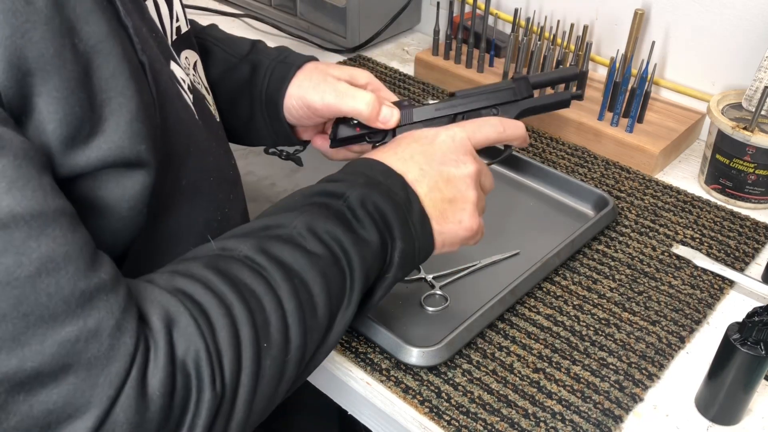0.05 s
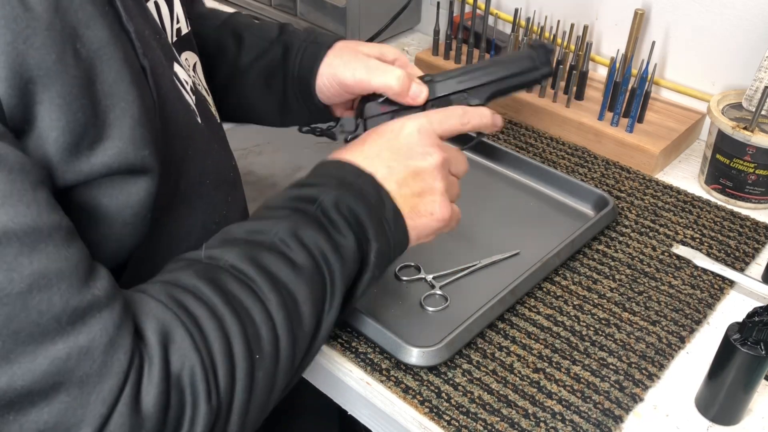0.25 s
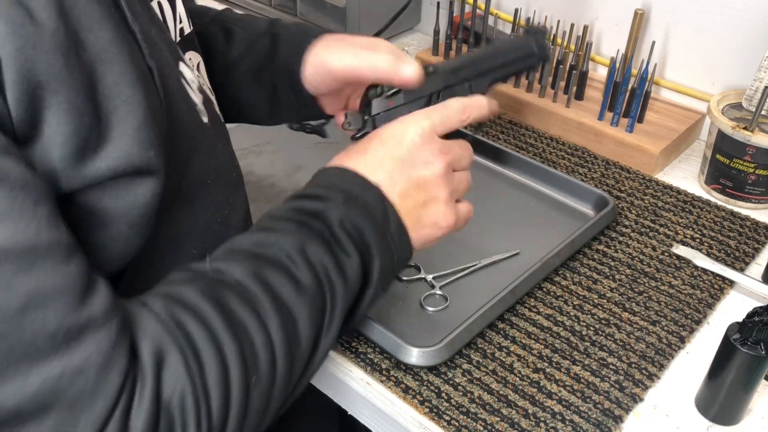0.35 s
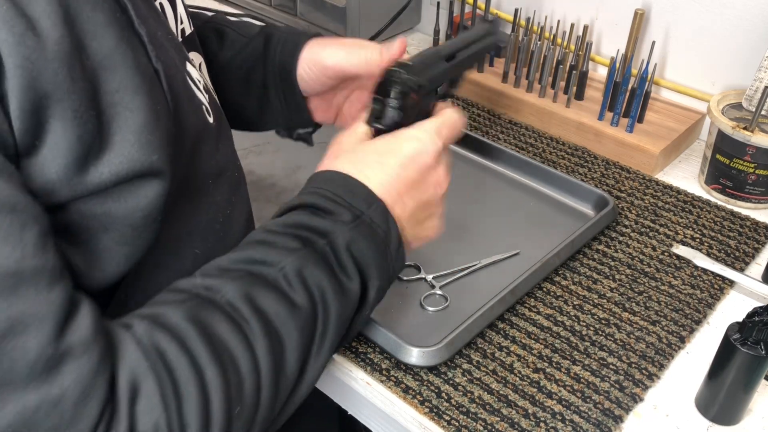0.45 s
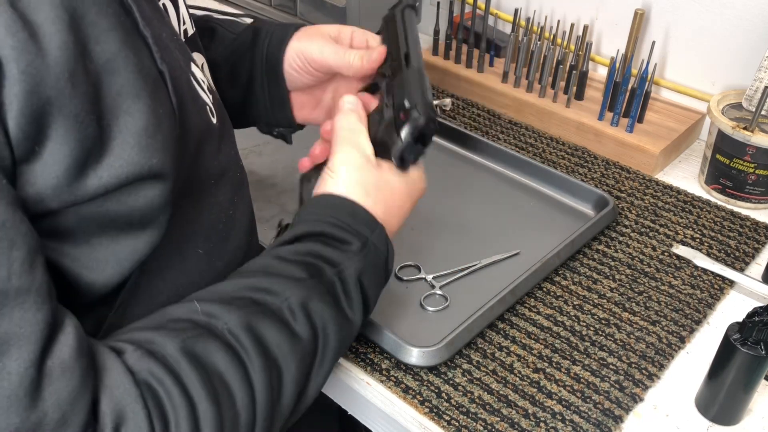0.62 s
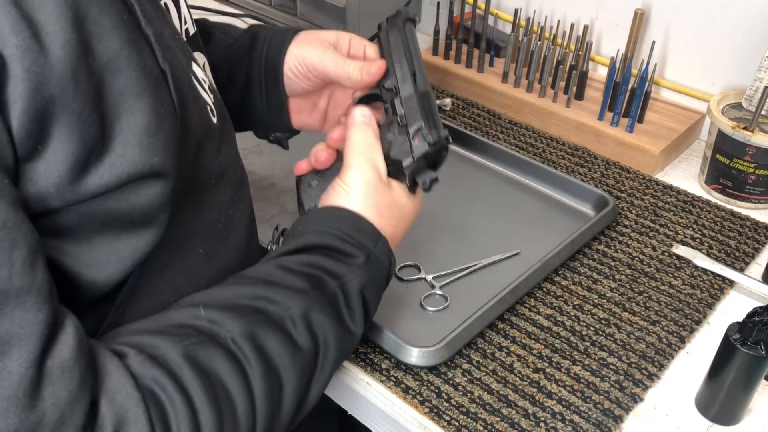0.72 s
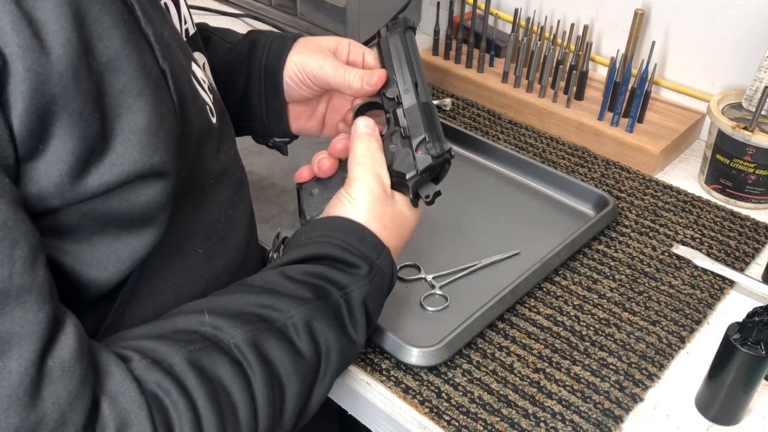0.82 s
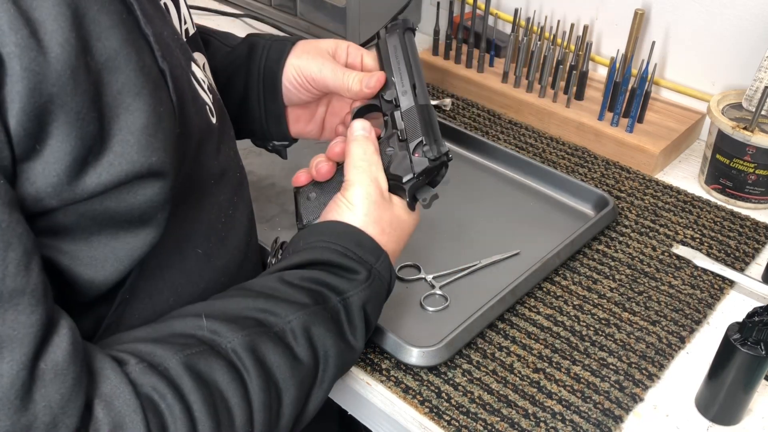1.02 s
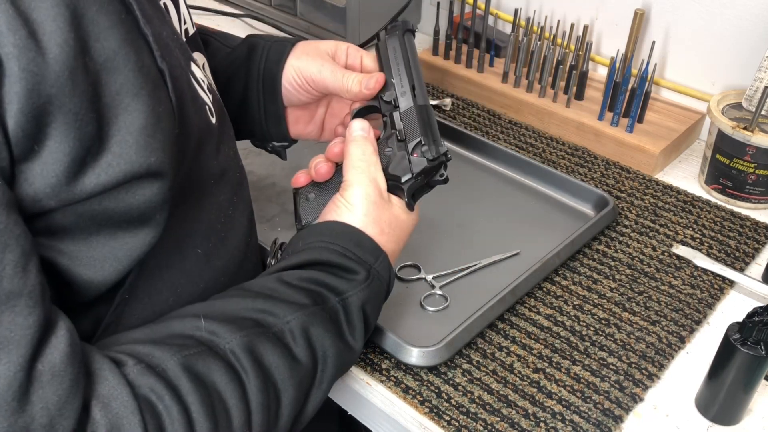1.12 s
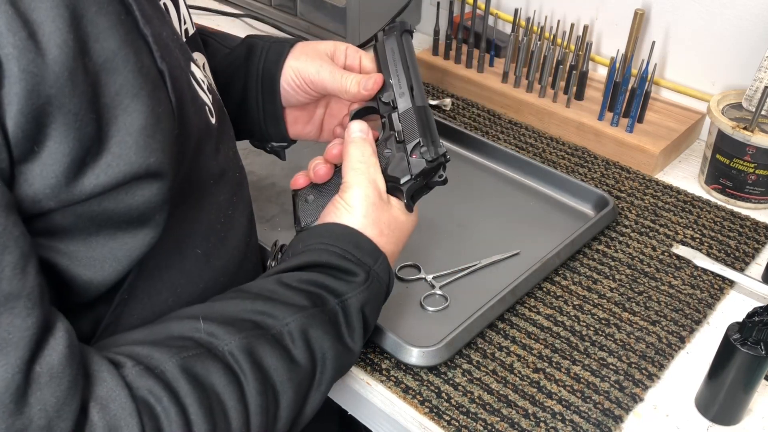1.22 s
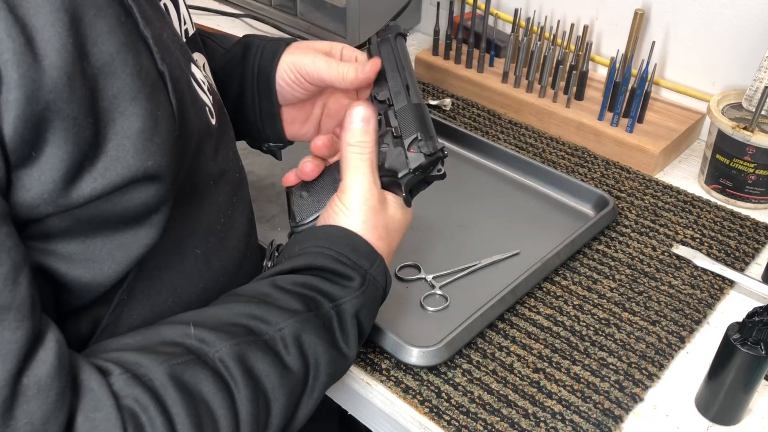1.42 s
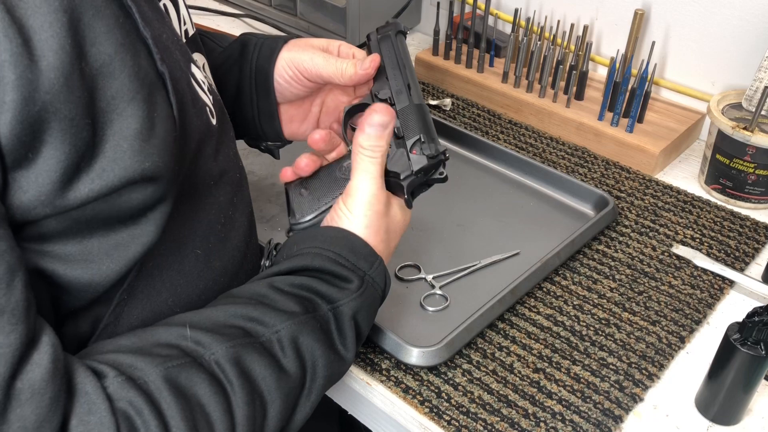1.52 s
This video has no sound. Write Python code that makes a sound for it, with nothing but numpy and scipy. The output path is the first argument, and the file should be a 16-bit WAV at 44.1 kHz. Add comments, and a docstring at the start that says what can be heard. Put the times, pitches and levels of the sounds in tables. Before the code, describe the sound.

A pistol slide is worked by hand in a hard-walled workshop. The tail of an earlier blow fades at the start; at 0.2 s a short scrape leads into a loud, tight cluster of steel clacks with a dull thud and bright reverberation. Barely audible ticks follow around 0.7-0.85 s. At 1.02 s a catch snaps crisply; at 1.34-1.39 s come faint ticks and a softer click, over low rumble, slight rustle and faint hum.

```python
"""A pistol slide is worked by hand over a workbench: steel scrapes, slams home and a catch snaps over.
Each contact is a short pulse and a scattered crack over ringing steel modes; dull thuds lie under the blows.
The hard-walled workshop answers with one wall echo and a long bright tail of noise decaying by bands.
Behind it lie room noise, low rumble, a rustle of sleeve and hand, and a faint wavering electrical hum."""
import sys
import numpy as np
from scipy import signal
from scipy.fft import rfft, irfft
from scipy.io import wavfile

SR = 44100
rng = np.random.default_rng(int(sys.argv[2]) if len(sys.argv) > 2 else 0)


def wav_out(sig):
    """Save sig, one row per channel (or a flat mono array), as 16-bit PCM at SR to the path in sys.argv[1]."""
    wavfile.write(sys.argv[1], SR, np.round(np.clip(np.atleast_2d(sig).T, -1, 1) * 32767).astype(np.int16))


def volts_from_decibels(level):
    """Turn decibel levels (scalar or array-like) into linear amplitude factors."""
    exponent = np.asarray(level, float) / 20
    return 10 ** exponent


N = 68355
LEAD = SR // 4  # samples kept ahead of time zero, for blows whose tails are already sounding

# The slide slams home. Each row: start in seconds, nominal level in dB, centre of the blow's colour in Hz,
# its width in octaves, crack T60 in seconds, ringing in dB.
SLIDE_SLAMS = [(-0.06, -12, 3180, 0.77, .03, -20.5), (-0.05, -25.5, 2570, 2.13, .03, -22.5),
               (0.1997, -8, 4500, 1.25, .025, -4), (0.2028, -8.5, 3500, 1.41, .025, -9.5),
               (0.2094, -2, 2750, 0.49, .006, -14)]
# The catch snaps over. Each row: the same columns as the slams.
CATCH_SNAPS = [(1.0221, -6.5, 5660, 1.106, 0.017, -6), (1.0236, -18.5, 1940, 0.92, 0.0087, -15),
               (1.0275, -18.5, 7950, 0.92, 0.022, -1.5), (1.392, -28.5, 4000, 1.5, .018, -24),
               (1.3926, -22, 4960, 0.3, 0.018, -40)]
# Modes of slide and frame. Each row: frequency in Hz, level in dB when the slide strikes,
# level in dB when the catch strikes, T60 in seconds.
STEEL_MODES = [(563, -13.5, -9.5, 0.01), (1200, -7, -43, 0.056), (1600, -20.5, -5, 0.035),
               (2142, 0, -5, 0.036), (2341, -4.5, -5, 0.02), (2537, -4, -3, 0.032),
               (2654, -4.5, -31, 0.033), (2911, -12.5, -15, .04), (3500, -8, -21, 0.017),
               (4370, -2.5, -6.5, 0.1), (4506, -2.5, 1.5, 0.028), (5094, -7.5, -21.5, 0.047),
               (5260, -9.5, -6.5, .03), (5914, -2, 0.5, .03), (6450, -6, -8, 0.027),
               (7285, -19, -10.5, 0.038), (8790, -5, -9, .03), (8960, -11.5, -5.5, .03),
               (9720, -12.5, -16.5, 0.021), (10640, -21, -9, 0.027), (11700, -13.5, -28, 0.051),
               (12860, -19, -13, .02), (14600, -22, -24.5, .03)]
# Dull knocks of the frame in the hand. Each row: start in seconds, dry peak in dB, lower edge in Hz,
# upper edge in Hz, T60 in seconds.
FRAME_THUDS = [(-0.06, -32, 287, 1050, 0.046), (0.187, -44, 302, 1200, 0.024),
               (0.2089, -24.5, 215.6, 1099, .03), (1.0227, -24.5, 403, 1587, 0.014),
               (1.3921, -37, 470, 2340, .025)]
# Small ticks of loose parts. Each row: start in seconds, nominal level in dB, colour in Hz.
LOOSE_TICKS = [(0.1978, -67, 4040), (0.72, -64, 4413), (0.755, -63, 4850), (0.85, -63.5, 4500),
               (0.966, -71, 5070), (1.0175, -29, 5080), (1.0181, -30.5, 5500), (1.3372, -43.5, 8760),
               (1.338, -46.5, 4440), (1.3565, -55, 4800), (1.3602, -52.5, 4500), (1.3642, -48.5, 3000)]
# Slide scraping on its rails. Each row: start in seconds, length in seconds (clicks stop by 0.136 s),
# rms level in dB over that length, colour in Hz.
RAIL_SCRAPES = [(0.176, .024, -43.5, 2400), (1.016, .006, -33, 3835), (1.33, 0.17, -66.5, 3500)]
# Decay of the room tail. Each row: frequency in Hz, T60 in seconds.
ROOM_DECAY = [(250, .5), (600, 0.69), (1200, 0.6081), (2400, 0.59), (5000, 0.51), (9000, 0.4937),
              (15000, 0.07)]
# Colour of the room tail. Each row: frequency in Hz, relative level in dB.
ROOM_COLOUR = [(250, -11), (600, -3.5), (1200, 1), (2400, -0.8), (5000, -3.6), (9000, -2.56), (15000, 5)]
# Colour of the room noise. Each row: frequency in Hz, relative level in dB per Hz.
NOISE_COLOUR = [(70, -18), (120, -10.5), (250, -18), (500, -14.5), (1000, -20.5), (2500, -22.5),
                (5000, -28), (9000, -35), (16000, -48.5)]
# Course of the low rumble. Each row: time in seconds, rms level in dB.
RUMBLE_LEVEL = [(0.0, -63.5), (0.2, -59), (0.6, -57.5), (0.9, -58), (1.15, -62), (1.33, -47), (1.45, -55.5),
                (1.55, -54.5)]
# Colour of the rumble. Each row: frequency in Hz, relative level in dB per Hz.
RUMBLE_COLOUR = [(8, -20.5), (13, 3), (29, -3), (45, -19), (60, -12.5), (85, -26.5), (120, -29),
                 (200, -47.5), (500, -120)]
# Course of the rustle of sleeve and hand. Each row: time in seconds, rms level in dB.
RUSTLE_LEVEL = [(0.0, -100), (0.098, -84), (0.194, -63), (0.43, -83.5), (1.294, -72.5), (1.334, -65.5),
                (1.55, -68.5)]
# Electrical hum. Each row: frequency in Hz, nominal level in dB, onset in seconds.
HUM_LINES = [(360, -84, 0.0), (481, -78, .76), (1123, -81, 0.0)]

SKIRT_DB = -25.5  # weakest excitation, far from a blow's colour
PULSE_DB, MODE_SPREAD_DB = -1, 1.5  # peak of first contact; random spread of each mode
SCATTER_GAIN = 0.75  # feedback of the all-pass loops
SMALL_T60_S, SMALL_RING_DB = 0.006, -2  # crack decay and ringing of ticks and scrapes
TICK_OCTAVES, SCRAPE_OCTAVES = 0.35, 1
CLICKS_PER_S, CLICK_DIP_DB = 4000, 1.5  # scrape density; average drop below the strongest click
ECHO_S, ECHO_DB = 0.0088, -7  # nearest wall: about three metres of extra path
ROOM_DB, ROOM_ONSET_S = -6.5, 0.015  # tail energy against the direct sound; fade-in
EARLY_DB, EARLY_T60_S = -0.5, 0.15  # extra early tail
NOISE_DB = -70
RUSTLE_LOW_HZ, RUSTLE_HIGH_HZ = 88, 190
HUM_WIDTH_HZ = 5.5  # pole frequency of the wavering
PEAK_CEILING = 1.1  # height towards which peaks are rounded
CUTOFF_HZ = 17000  # edge of the stop band, 60 dB down


def in_log_hz(points, hz):
    """Read a table of frequency and value on a log frequency axis."""
    table_hz, value = np.transpose(points)
    return np.interp(np.log(np.maximum(hz, 1)), np.log(table_hz), value)


def dying(t60, size):
    """Exponential decay, falling 60 dB in t60 seconds."""
    return volts_from_decibels(-60 * np.arange(size) / (t60 * SR))


def band(x, low_hz, high_hz):
    """Band-pass between two edges, held within 20 Hz and 19 kHz."""
    edges = np.clip([low_hz, high_hz], 20, 19000)
    return signal.sosfilt(signal.butter(2, edges, "band", fs=SR, output="sos"), x)


def add(out, sound, s):
    """Mix a sound in at a time in seconds."""
    i = int(round(s * SR)) + LEAD
    out[i:i + len(sound)] += sound[:len(out) - i]


def colour(hz, centre_hz, octaves):
    """Bell-shaped weight in log frequency over a low skirt."""
    distance = np.log2(np.maximum(hz, 1) / centre_hz) / octaves
    return np.exp(-0.5 * distance ** 2) + volts_from_decibels(SKIRT_DB)


def scatter(t60, size):
    """A click scattered through a chain of short all-pass loops: a dying crackle with an even spectrum."""
    x = (np.arange(size) == 0) * np.sqrt(np.sum(dying(t60, size) ** 2))
    for share in rng.uniform(0.3, 1, 7) * np.geomspace(0.06, 0.008, 7):
        loop = np.zeros(int(share * t60 * SR) + 3)
        loop[0], loop[-1] = 1, -SCATTER_GAIN
        x = signal.lfilter(loop[::-1], loop, x + 1e-18)
    return x


def steel_ring(centre_hz, octaves, place, size):
    """Decaying sine modes of the steel, weighted by the blow's colour and by the place struck."""
    t = np.arange(size) / SR
    ring = np.zeros(size)
    for k, (hz, *place_db, t60) in enumerate(STEEL_MODES):
        level = volts_from_decibels(place_db[place] + MODE_SPREAD_DB * rng.standard_normal())
        level = level * colour(hz, centre_hz, octaves) * (-1) ** k  # neighbours in opposite sign
        ring += level * np.sin(2 * np.pi * hz * t) * dying(t60, size)
    return ring


def blow(centre_hz, octaves, crack_t60, ring_db, place=0, size=8192):
    """One contact: a pulse and a scattered crack over the ringing modes (place 0 slide, 1 catch)."""
    low, high = centre_hz * 2 ** -octaves, centre_hz * 2 ** octaves
    ring = volts_from_decibels(ring_db) * steel_ring(centre_hz, octaves, place, size)
    white = scatter(crack_t60, size)
    crack = band(white, low, high) + volts_from_decibels(SKIRT_DB) * white
    pulse = band((np.arange(size) == 0).astype(float), low, high)
    return ring + crack - volts_from_decibels(PULSE_DB) * pulse / np.max(np.abs(pulse))


def small_contact(hz, octaves):
    """A light contact of steel parts: a blow whose ringing is damped."""
    return blow(hz, octaves, SMALL_T60_S, SMALL_RING_DB) * dying(3 * SMALL_T60_S, 8192)


def thud(low_hz, high_hz, t60, size=4096):
    """A dull scattered knock that dies quickly, peak 1."""
    knock = band(scatter(t60, size), low_hz, high_hz)
    return knock / np.max(np.abs(knock))


def grit(length, size=6000):
    """Dense uneven clicks for the length of a stroke, within size samples."""
    when, big, sign = rng.random((3, size))
    clicks = (when < CLICKS_PER_S / SR) * np.sign(sign - 0.5)
    clicks = clicks * volts_from_decibels(CLICK_DIP_DB * np.log(big + 1e-3))
    return clicks * (np.arange(size) < length * SR)


def scrape(length, hz):
    """Steel rubbing on steel: grit in which every click sets off a small contact, scaled to rms 1."""
    rub = signal.fftconvolve(grit(length), small_contact(hz, SCRAPE_OCTAVES))
    return rub / np.std(rub[:int(length * SR)])


def pistol():
    """Blows, thuds, ticks and scrapes on one steel body, dry."""
    out = np.zeros(N + LEAD)
    for place, table in enumerate((SLIDE_SLAMS, CATCH_SNAPS)):
        for s, db, *kind in table:
            add(out, volts_from_decibels(db) * blow(*kind, place=place), s)
    for s, db, *kind in FRAME_THUDS:
        add(out, volts_from_decibels(db) * thud(*kind), s)
    for s, db, hz in LOOSE_TICKS:
        add(out, volts_from_decibels(db) * small_contact(hz, TICK_OCTAVES), s)
    for s, length, db, hz in RAIL_SCRAPES:
        add(out, volts_from_decibels(db) * scrape(length, hz), s)
    return out


def room_tail():
    """Diffuse noise that dies band by band, stronger early on, with unit energy."""
    size = SR * 3 // 2
    edges = 120 * 2 ** np.arange(0, 7.3, 0.5)  # half octaves
    white = rng.standard_normal((2, size))
    tail = np.zeros(size)
    for k, (low, high) in enumerate(zip(edges, edges[1:])):
        hz = np.sqrt(low * high)
        level = volts_from_decibels(in_log_hz(ROOM_COLOUR, hz))
        # neighbouring bands take different noise
        tail += level * band(white[k % 2], low, high) * dying(in_log_hz(ROOM_DECAY, hz), size)
    tail = tail * (1 + volts_from_decibels(EARLY_DB) * dying(EARLY_T60_S, size))
    tail = tail * np.clip(np.arange(size) / SR / ROOM_ONSET_S, 0, 1) ** 2
    return tail / np.sqrt(np.sum(tail ** 2))


def workshop(x):
    """Direct sound, one wall echo and the diffuse tail, by convolution."""
    answer = volts_from_decibels(ROOM_DB) * room_tail()
    answer[0] += 1
    answer[int(ECHO_S * SR)] += volts_from_decibels(ECHO_DB)
    return signal.fftconvolve(x, answer)[LEAD:LEAD + N]


def rms_one(x):
    """Scale to rms 1."""
    return x / np.sqrt(np.mean(x ** 2) + 1e-20)


def coloured(points, size):
    """Noise with a given spectrum, empty up to its first frequency, rms 1."""
    hz = np.arange(size // 2 + 1) * SR / size
    shape = volts_from_decibels(in_log_hz(points, hz)) * (hz > points[0][0])
    return rms_one(irfft(rfft(rng.standard_normal(size)) * shape, size))


def course(points):
    """Gain over time from a table of seconds and dB."""
    return volts_from_decibels(np.interp(np.arange(N) / SR, *np.transpose(points)))


def room_noise():
    """Steady coloured noise of the room."""
    return volts_from_decibels(NOISE_DB) * coloured(NOISE_COLOUR, N)


def rumble():
    """Low coloured noise that swells and sinks."""
    return course(RUMBLE_LEVEL) * coloured(RUMBLE_COLOUR, N)


def rustle():
    """Soft low rustle of sleeve and hand: band-passed noise under a level curve."""
    return course(RUSTLE_LEVEL) * rms_one(band(rng.standard_normal(N), RUSTLE_LOW_HZ, RUSTLE_HIGH_HZ))


def hum():
    """Sine lines whose levels waver with slow smoothed noise."""
    t = np.arange(N) / SR
    out = np.zeros(N)
    r = np.exp(-2 * np.pi * HUM_WIDTH_HZ / SR)
    for hz, db, start in HUM_LINES:
        waver = rms_one(signal.lfilter([1], [1, -2 * r, r * r], rng.standard_normal(N)))
        level = volts_from_decibels(db + 1.5 + 2.5 * waver)  # amplitude in dB, wavering by 2.5 dB rms
        out += level * np.sin(2 * np.pi * hz * t) * np.clip((t - start) / 0.01, 0, 1)
    return out


def background():
    """Sum of the quiet layers behind the pistol."""
    return room_noise() + rumble() + rustle() + hum()


def scene():
    """Pistol in its workshop over the background, one channel."""
    return (workshop(pistol()) + background())[None]


def roll_off(x):
    """The treble ends steeply here."""
    return signal.sosfilt(signal.butter(12, 16810, fs=SR, output="sos"), x)


def record(dry):
    """The microphone signal has its peaks softly rounded and its extreme top cut."""
    rounded = PEAK_CEILING * np.tanh(dry / PEAK_CEILING)
    low_pass = signal.cheby2(10, 60, CUTOFF_HZ, fs=SR, output="sos")
    finished = signal.sosfilt(low_pass, rounded)
    return roll_off(finished)


dry = scene()
out = record(dry)
wav_out(out)
```